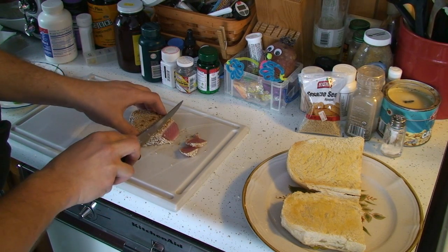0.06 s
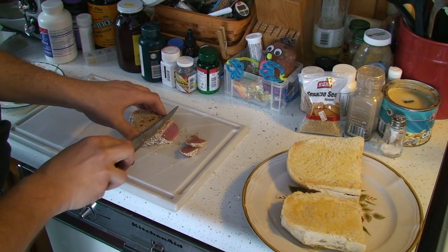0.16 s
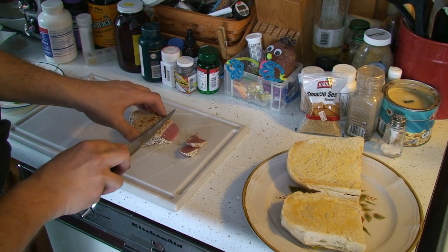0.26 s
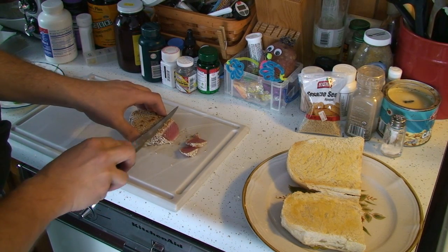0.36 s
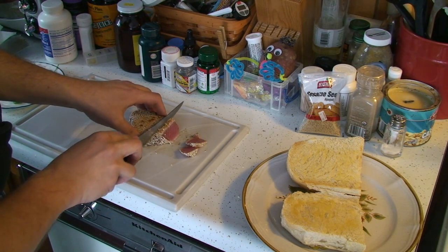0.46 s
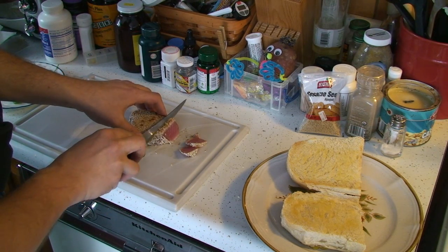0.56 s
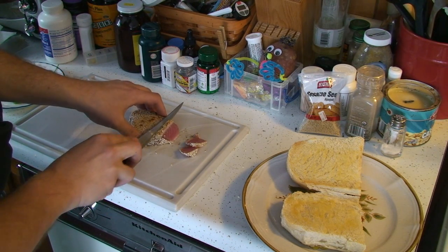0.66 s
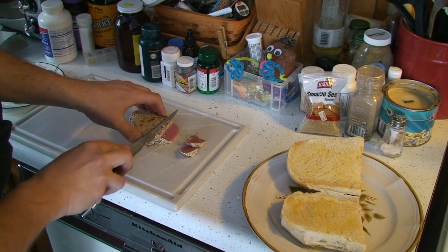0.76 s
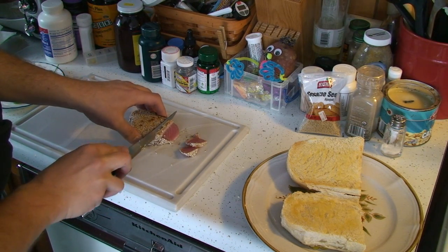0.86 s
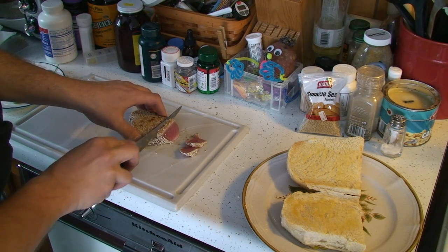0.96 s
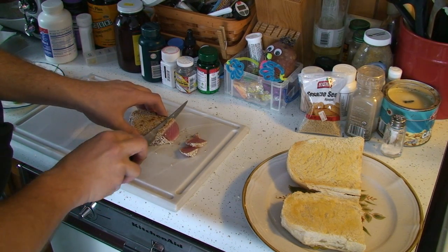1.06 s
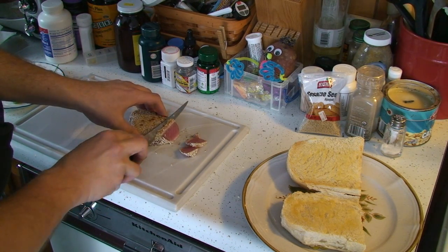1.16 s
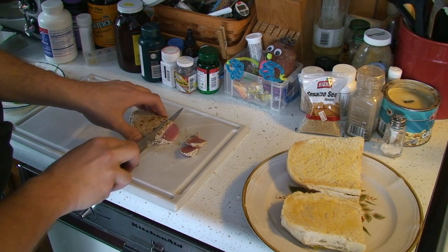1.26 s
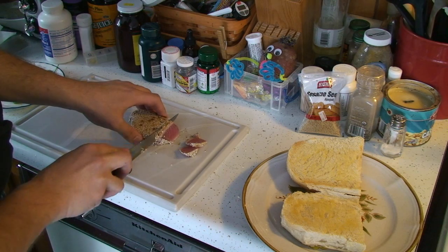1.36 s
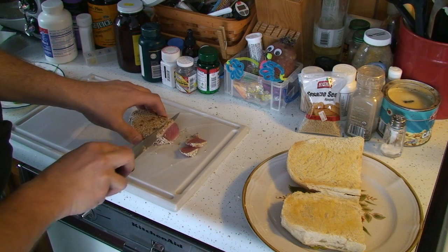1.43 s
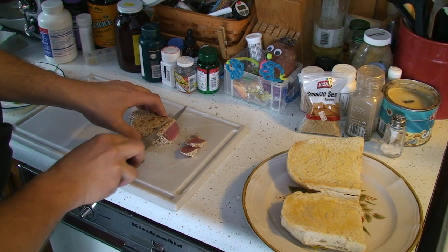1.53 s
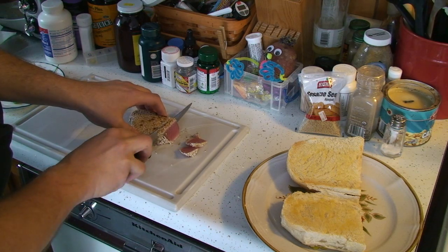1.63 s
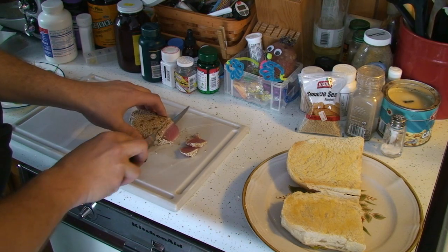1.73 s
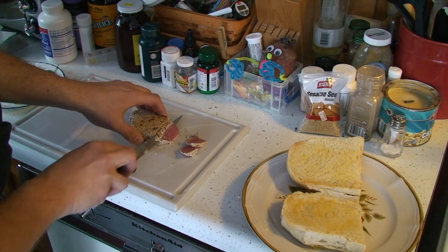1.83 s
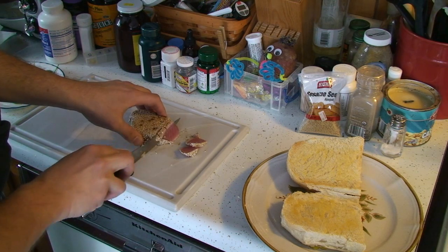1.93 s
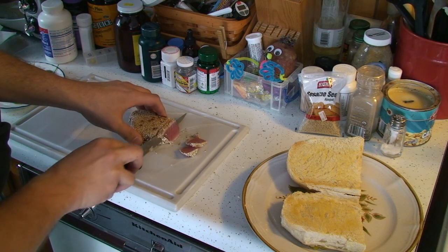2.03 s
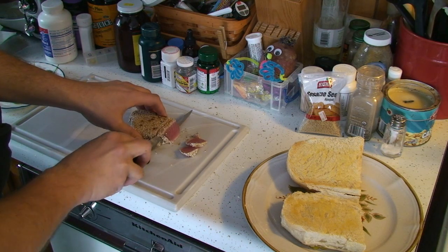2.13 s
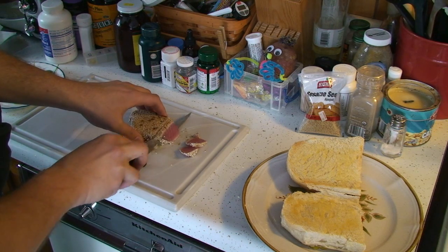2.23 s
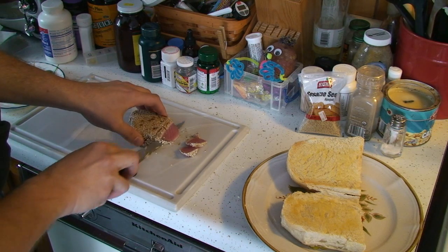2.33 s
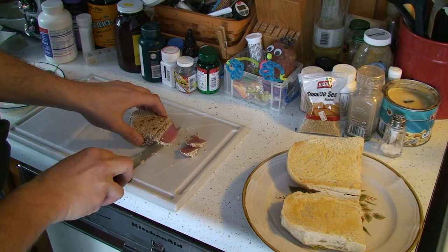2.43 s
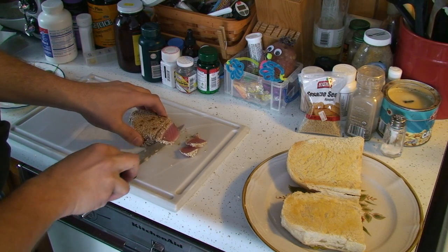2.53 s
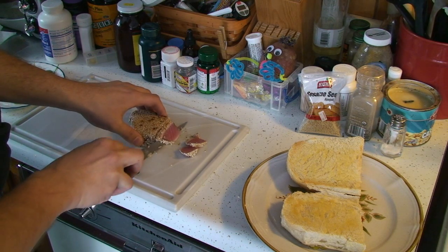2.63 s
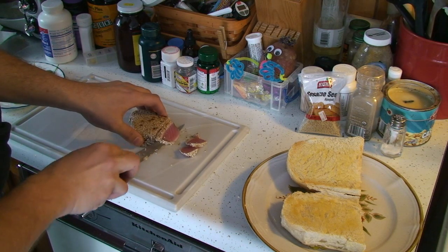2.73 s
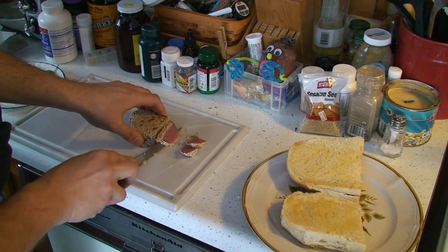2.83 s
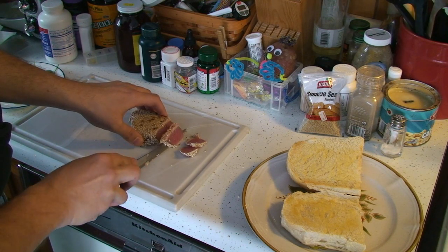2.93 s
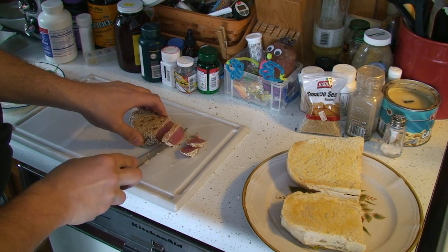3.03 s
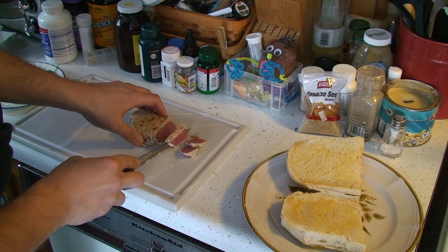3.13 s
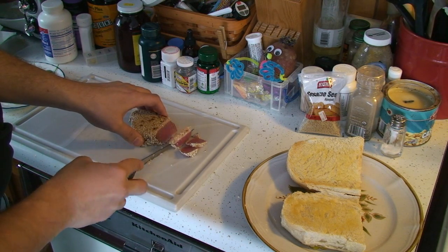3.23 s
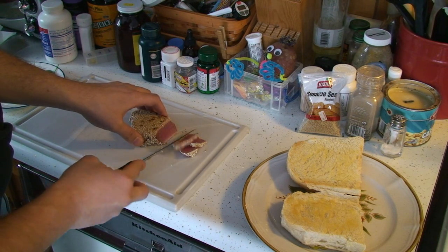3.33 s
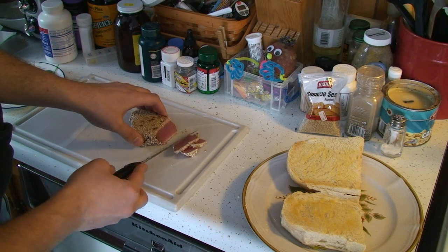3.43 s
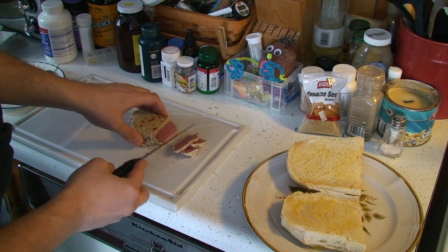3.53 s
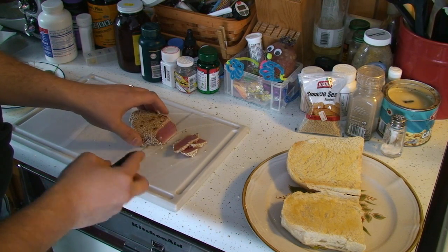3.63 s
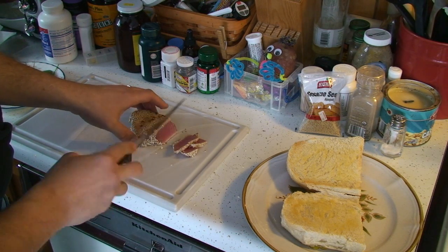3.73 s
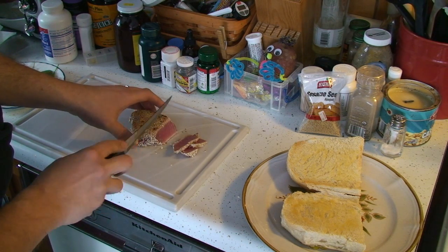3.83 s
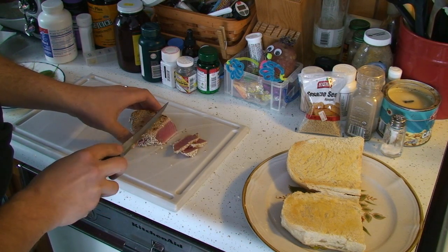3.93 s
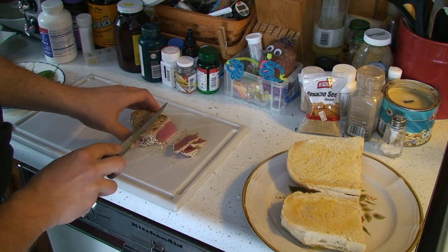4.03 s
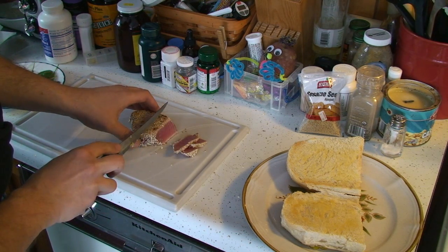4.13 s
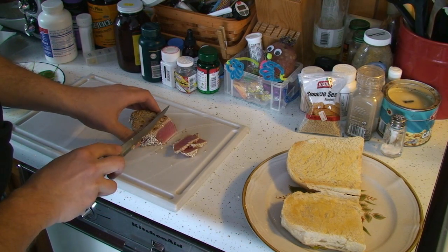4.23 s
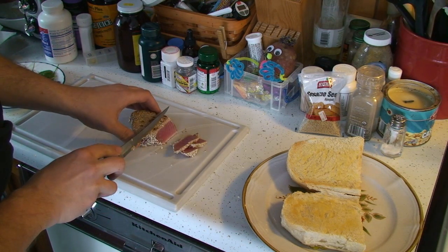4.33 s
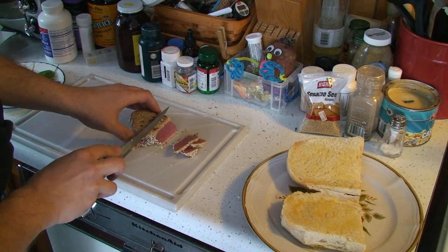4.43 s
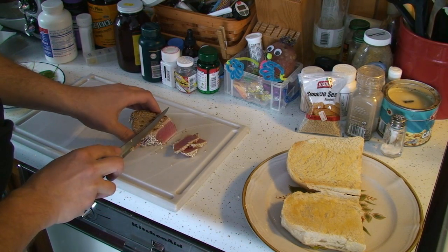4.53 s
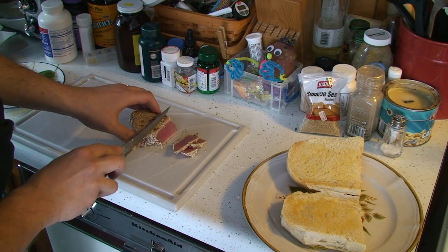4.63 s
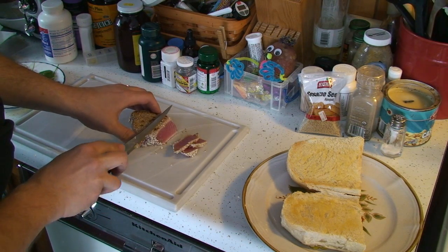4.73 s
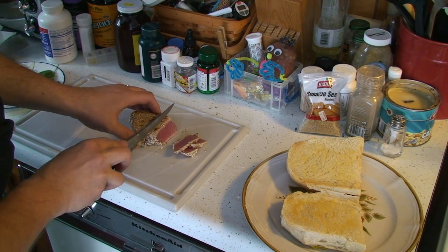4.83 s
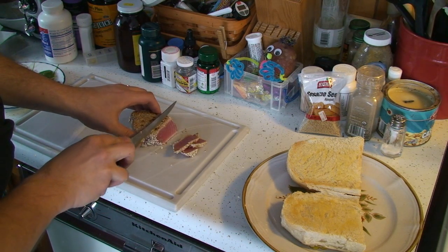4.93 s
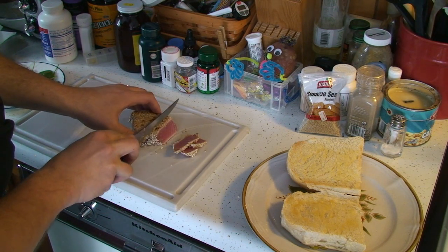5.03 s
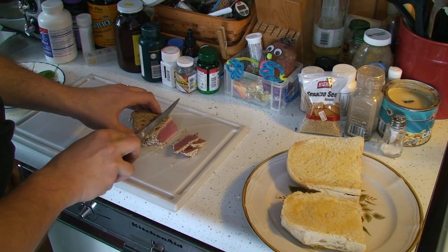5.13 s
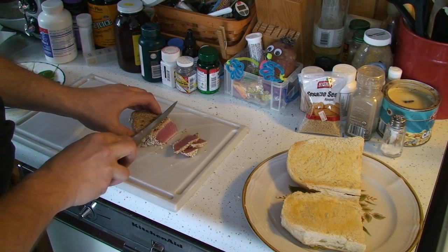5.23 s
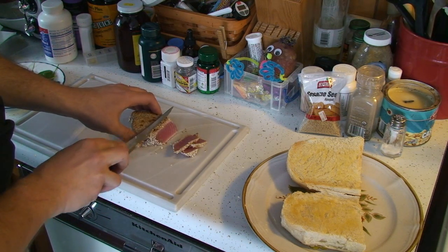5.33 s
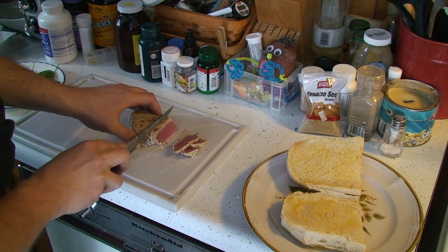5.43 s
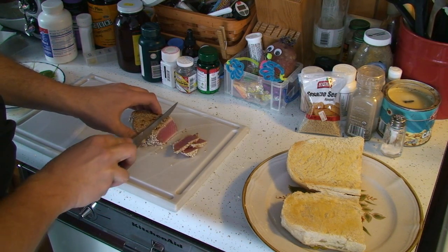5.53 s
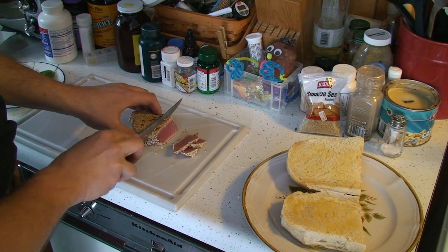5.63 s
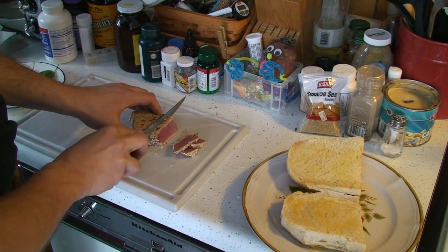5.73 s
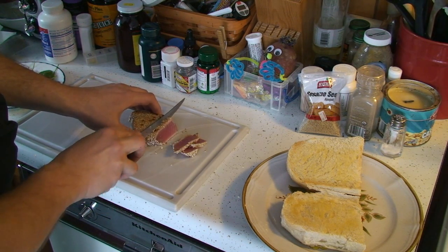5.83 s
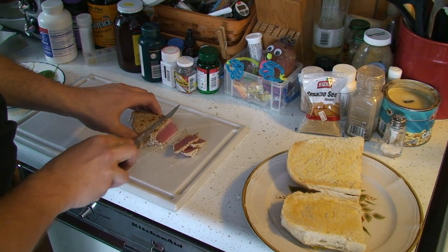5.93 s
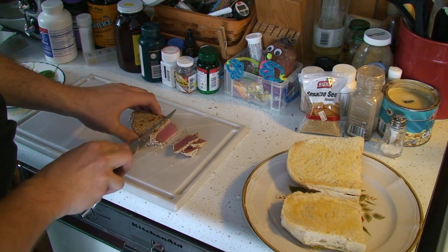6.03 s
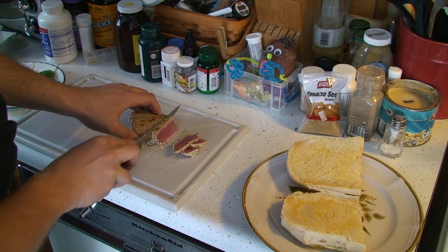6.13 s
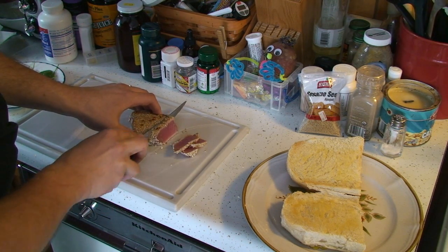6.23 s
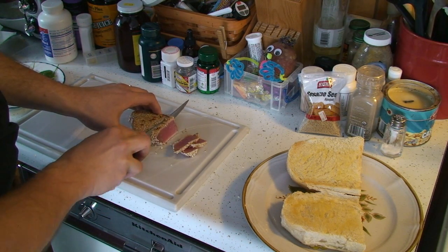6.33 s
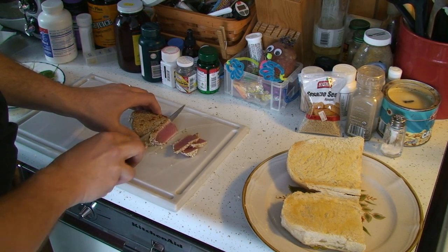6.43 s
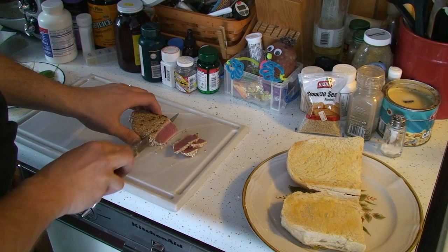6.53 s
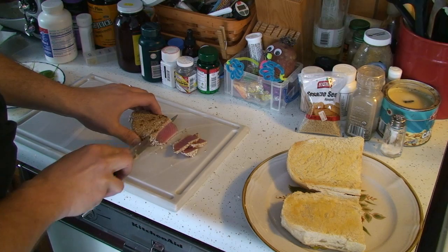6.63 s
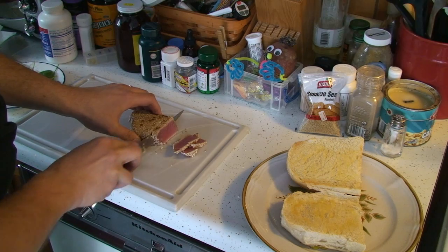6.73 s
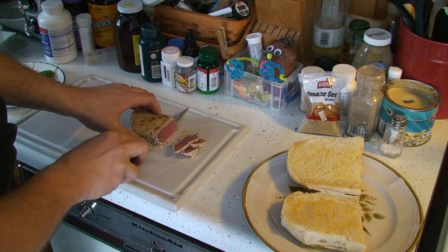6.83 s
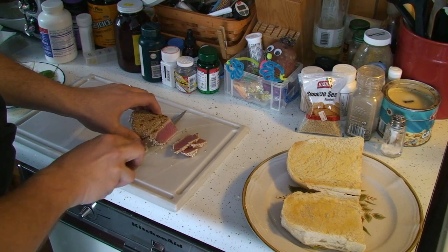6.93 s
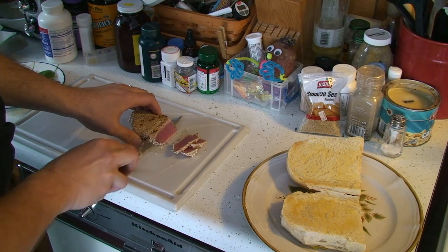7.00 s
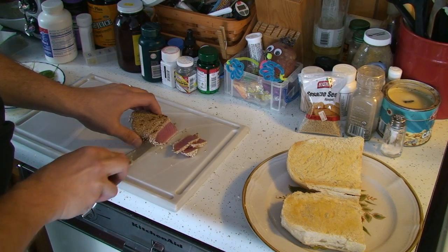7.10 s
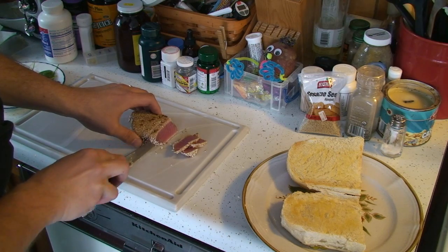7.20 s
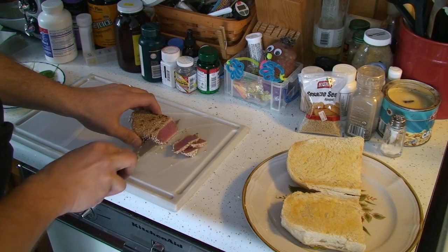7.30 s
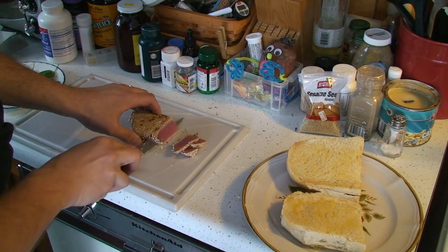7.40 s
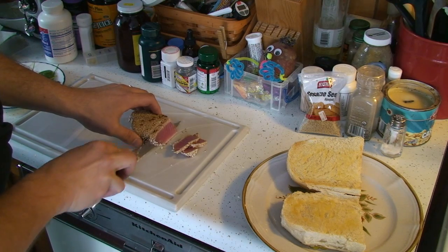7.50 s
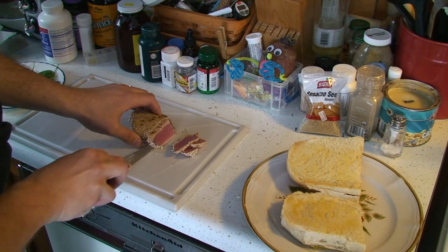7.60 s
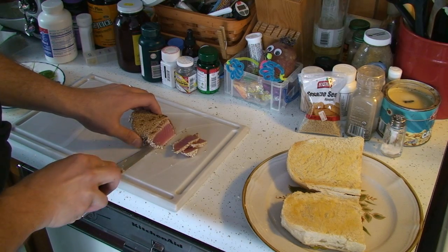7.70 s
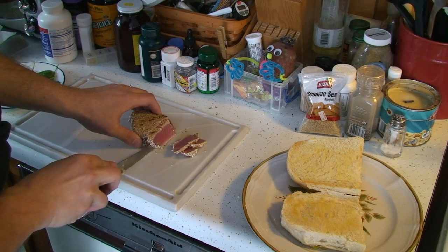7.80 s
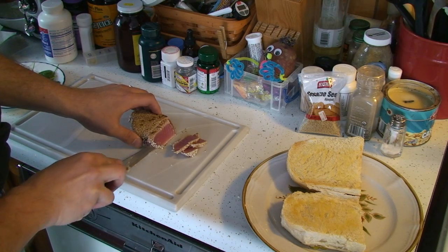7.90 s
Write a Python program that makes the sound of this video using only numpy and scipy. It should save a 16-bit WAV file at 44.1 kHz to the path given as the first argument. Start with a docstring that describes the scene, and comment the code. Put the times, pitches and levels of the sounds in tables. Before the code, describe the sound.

A knife saws through cooked fish in soft grainy strokes, with dull board taps, two hard knocks and scrapes, over a steady fan hum.

```python
"""Slicing tuna in a small kitchen

A knife saws through cooked tuna on a plastic board lying on a counter: shaped noise hisses with each stroke.
Knocks ring the board's modes; twice the blade comes down hard and scrapes, as rasping noise and a low judder.
Gliding tones make the wet fish's squeaks and the steel's whistle, short noise bursts the ticks.
An appliance runs throughout: fan air as noise, a hum and a thin whine as drifting sines."""
import sys
import numpy as np
from scipy import signal
from scipy.fft import rfft, irfft
from scipy.io import wavfile

SR = 44100
rng = np.random.default_rng(int(sys.argv[2]) if len(sys.argv) > 2 else 0)


def dump(signal):
    """Clip the signal to [-1, 1] and save it as 16-bit WAV at the path in sys.argv[1]."""
    limited = np.clip(np.atleast_2d(signal).T, -1, 1)
    pcm = np.round(limited * 32767).astype(np.int16)
    wavfile.write(sys.argv[1], SR, pcm)


N = 351036

# Modes of the board on its counter. Each row: frequency in Hz, level in dB, t60 in s.
BOARD_MODES = [(47.1, -32, 0.9), (79, -24.5, 0.54), (109.8, -22, 0.25), (152, -23, .25), (229.2, -15, 0.26),
               (316, -19, 0.062), (398.8, -4, 0.17), (435.6, -0.5, 0.13), (483, -16, 0.11),
               (599, -15.5, 0.23), (650, -9, 0.16), (703.4, -5.5, 0.15), (735, -3.5, 0.098),
               (784, 2, 0.097), (841, -19, 0.24), (938, -9.5, 0.14), (1024, -11, 0.2), (1078.5, -2, 0.083),
               (1164, 1, 0.062), (1210, -2, 0.048), (1278, -19, 0.094), (1460, -7, 0.095),
               (1493, -11.5, 0.14), (1678, -3.5, 0.086), (1783, -6.5, 0.099), (2146, -8.5, 0.057),
               (2307, -15.5, 0.16), (2485, -14.5, 0.039), (3124, -14.5, 0.14), (3162, -12, 0.13)]
# Spectrum of contact rubbing along the board or the wet fish. Each row: frequency in Hz, density in dB per Hz.
RUB_SPECTRUM = [(60, -12), (250, -21), (420, 4.5), (560, 2), (760, -4.5), (930, -4), (1150, 0), (1750, -5),
                (2400, -10.5), (3200, -16.5), (4200, -18), (9000, -40)]


def gain_of(db):
    """Decibels to amplitude."""
    return 10 ** (np.asarray(db) / 20)


def evened(x):
    """Scales to rms 1."""
    return x / np.sqrt(np.mean(x ** 2) + 1e-20)


def read(points, hz):
    """Reads a table at hz, joining its points on a log-frequency axis."""
    f, value = np.transpose(points)
    return np.interp(np.log(hz + 1), np.log(f + 1), value)


def bumps(peaks, f):
    """dB added by resonances given as (Hz, width Hz, dB)."""
    return sum(db / (1 + (2 * (f - hz) / width) ** 2) for hz, width, db in peaks)


def add(mix, s, sound):
    """Mixes a sound in at time s."""
    part = mix[:, max(round(s * SR), 0):][:, :sound.shape[-1]]
    part += sound[..., :part.shape[1]]


def wander(n, hz):
    """Slow chance of rms 1, up to about hz changes a second."""
    f = np.fft.rfftfreq(n, 1 / SR)
    slow = rfft(rng.standard_normal(n)) / (1 + (f / hz) ** 4)
    return evened(irfft(slow, n))


def noise(n, shape_db, same=None):
    """Stereo noise of rms 1 with the spectrum shape_db(hz); same tells how alike the channels are."""
    if same is None:
        # Likeness of the two microphone channels. Each row: frequency in Hz, correlation from 0 to 1.
        same = [(30, 0.8), (150, 0.1), (700, 0.1), (2000, 0.083), (3300, 0.24), (4500, 0.25), (7500, 0.53),
                (9500, 0.19), (11000, 0.99), (16000, 1)]
    hz = np.fft.rfftfreq(n, 1 / SR)
    mid, side = rfft(rng.standard_normal((2, n))) * gain_of(shape_db(hz))
    correlation = np.clip(read(same, hz), 0, 1)
    mid, side = mid * np.sqrt(1 + correlation), side * np.sqrt(1 - correlation)
    return evened(irfft(np.array([mid + side, mid - side]), n))


def colour(x, shape_db, size=4096):
    """Causal, minimum-phase filter with the gain shape_db(hz)."""
    hz = abs(np.fft.fftfreq(size, 1 / SR))
    log_gain = np.log(np.maximum(gain_of(shape_db(hz)), 1e-5))
    response = np.exp(np.conj(signal.hilbert(log_gain)))
    taps = np.fft.ifft(response).real[:size // 2]
    return signal.fftconvolve(x, taps[None], axes=1)[:, :x.shape[1]]


def kitchen(air_db=-50.5, waver_db=0.5, right_db=0.7):
    """Steady fan air with resonant bands, a hum and a thin whine that dips once, all leaning to the right."""
    # Fan air at the microphone. Each row: frequency in Hz, density in dB per Hz.
    air_spectrum = [(20, -7), (50, 2.5), (90, -6.5), (160, -4.5), (330, -4.5), (450, 2), (540, -2.5),
                    (680, 0.5), (900, -7), (1500, -11), (4200, -18.5), (8500, -17.5), (12000, -25),
                    (16000, -34)]
    # Narrow bands in that air. Each row: centre in Hz, width in Hz, dB over the air.
    fan_bands = [(3210, 380, 4), (4580, 38, 10.5), (6220, 67, 10), (6500, 97, 11), (6850, 200, -2),
                 (7200, 140, 8.5), (7620, 210, 3)]
    hum_hz, hum_db, hum_drift_hz = 241, -57.5, 0.36
    whine_hz, whine_usual_db, whine_drift_hz = 3292, -68, 2
    dip_at_s, dip_db, dip_fall_s, dip_recover_s = 3.2, 6, 0.36, 0.55

    air = gain_of(air_db) * noise(N, lambda f: read(air_spectrum, f) + bumps(fan_bands, f))
    since = np.arange(N) / SR - dip_at_s
    dip_length = np.where(since < 0, dip_fall_s, dip_recover_s)
    whine_db = whine_usual_db - dip_db * np.exp(-(since / dip_length) ** 2)
    for hz, db, drift in (hum_hz, hum_db, hum_drift_hz), (whine_hz, whine_db, whine_drift_hz):
        turns = np.cumsum(hz + drift * wander(N, 5.2)) / SR
        level = np.sqrt(2) * gain_of(db + waver_db * wander(N, 2.2))  # the root makes db an rms level
        air = air + level * np.sin(2 * np.pi * turns)
    return air * gain_of([[-right_db], [right_db]])


def slicing(flesh_db=2.5, grain_db=2):
    """Fibres parting under the blade: a fine, grainy hiss that follows its speed, one arch a stroke."""
    # Each push or pull of the blade. Each row: start in seconds, length in seconds,
    # level in dB at full speed, before the common lift flesh_db.
    strokes = [(-.1, .21, -61.5), (0.127, .225, -56), (0.37, .26, -55.5), (0.67, 0.28, -56),
               (0.932, 0.28, -55.5), (1.213, 0.27, -56.5), (1.478, .245, -54.5), (1.758, 0.26, -54.5),
               (2.01, 0.24, -55.5), (2.235, .26, -64), (4.65, 0.6, -59), (5.22, 0.29, -57),
               (5.462, 0.38, -57.5), (5.882, 0.25, -55.5), (6.132, 0.25, -54.5), (6.447, 0.23, -54.5),
               (6.716, .215, -54), (6.99, .27, -54.5)]
    # Hiss of the parting flesh. Each row: frequency in Hz, density in dB per Hz.
    flesh_spectrum = [(300, -26), (1000, 6.5), (2500, 2), (4500, -0.5), (8000, 3), (10000, 0.5),
                      (12500, -12.5), (16000, -14)]
    t = np.arange(N) / SR
    speed = sum(gain_of(db) * np.sin(np.pi * np.clip((t - s) / length, 0, 1)) for s, length, db in strokes)
    grain = evened(gain_of(grain_db * wander(N, 400)))
    hiss = noise(N, lambda f: read(flesh_spectrum, f)) * grain
    return gain_of(flesh_db) * hiss * speed


def ring(t, phases, spot_db=1, travel_s=0.13, spread=0.087, direct_db=6, direct_s=0.0055):
    """The board's modes: low bending waves arrive late, and the first pass is the strongest."""
    hz, db, t60 = np.transpose(BOARD_MODES)[:, :, None]
    weight, apart = rng.standard_normal((2, len(BOARD_MODES), 1))  # each blow weights the modes anew
    swell = 1 - np.exp(-(t * np.sqrt(hz) / travel_s) ** 3)
    direct = direct_db * np.exp(-(t / direct_s) ** 2)
    size = gain_of(db + spot_db * weight - 60 * t / t60 + direct) * swell
    turns = hz * t + phases
    return np.array([(size * np.sin(2 * np.pi * turns + ear * spread * apart)).sum(0) for ear in (-1, 1)])


def clatter(t, crack_db=7, crack_s=0.0026, travel_s=0.06):
    """Dense resonances: a crack that sweeps from treble to bass, then each band dies at its own speed."""
    # Higher modes and near reflections. Each row: frequency in Hz, density in dB per Hz.
    clatter_spectrum = [(30, -27), (90, -19.5), (200, -14), (310, -8), (420, -0.5), (540, -8.5), (750, -3),
                        (930, -8.5), (1150, 0.5), (1750, -6.5), (2400, -8.5), (3200, -8), (4200, -14),
                        (7000, -15), (15000, -21)]
    # How long they last. Each row: frequency in Hz, t60 in s.
    clatter_t60 = [(80, 0.66), (260, 0.25), (700, 0.11), (1800, 0.14), (4000, 0.063), (10000, 0.069)]
    hiss = noise(len(t), lambda f: read(clatter_spectrum, f), [(500, 1.0), (1500, 0.87), (5000, 0.89)])
    hz, when, z = signal.stft(hiss, SR, nperseg=128, noverlap=96)
    hz = hz[:, None]
    late = when + 0.0014 - travel_s / np.sqrt(hz + 100)  # time since this band's wave arrived
    onset = 1 / (1 + np.exp(-np.maximum(late / 0.0011, -30)))
    decay_db = -60 * when / read(clatter_t60, hz)
    crack = crack_db * np.exp(-abs(late) / crack_s)
    z = z * onset * gain_of(decay_db + crack)
    return signal.istft(z, SR, nperseg=128, noverlap=96)[1][:, :len(t)]


def knocks(ring_db=-3.0, clatter_db=-4.0, thump_hz=240, spot_db=3, spot_width=0.49, size=22050):
    """Each blow rings the board; soft contact through the fish cuts the treble and leaves a thump."""
    # Blade meets board. Each row: time in seconds, level in dB before the filtering,
    # contact cut-off in Hz (high is hard), thump in dB (the weight of the hand), Hz favoured by the spot struck.
    blows = [(.107, -49.5, 890, 21, 430), (0.649, -45, 1020, 24.5, 397), (.682, -34, 1610, 6, 380),
             (1.181, -43.5, 950, 25.5, 400), (1.264, -36, 1640, 16.5, 800), (1.703, -48.5, 400, 27, 400),
             (1.791, -38, 1240, 12.5, 800), (2.17, -25.5, 2600, -7, 1230),
             (2.4576, -15.5, 2320, -11.5, 750), (2.4626, -14, 990, -9, 720), (2.5866, -22.5, 1880, 7, 714),
             (2.601, -27.5, 1800, 1, 1100), (3.638, -37.5, 1570, 13, 387), (4.086, -44, 1800, -3, 600),
             (4.615, -56, 400, 24, 300), (5.2207, -38, 1900, 15.5, 800), (5.825, -45, 540, 26, 430),
             (5.881, -40.5, 1770, 16, 750), (6.439, -45.5, 1400, 17, 397), (6.8662, -32, 2070, 10, 1090),
             (7.282, -27.5, 2940, 2.5, 1390), (7.3324, -21, 2200, 1, 684), (7.511, -47, 1760, 15, 540),
             (7.6324, -13.5, 3180, -1.5, 1450)]
    out, t = np.zeros((2, N)), np.arange(size) / SR
    early = t < .03  # both parts are levelled over their first 30 ms
    for s, db, contact_hz, thump_db, spot_hz in blows:
        parts = ring(t, rng.random((len(BOARD_MODES), 1))), clatter(t)
        blow = sum(gain_of(share) * p / p[:, early].std() for share, p in zip((ring_db, clatter_db), parts))
        spot = [(spot_hz, spot_width * spot_hz, spot_db)]

        def contact(f):
            thump = thump_db / (1 + (f / thump_hz) ** 2)
            softness = 10 * np.log10(1 + (f / contact_hz) ** 4)
            return thump - softness + bumps(spot, f)

        add(out, s, gain_of(db) * colour(blow, contact))
    return out


def snaps(decay_s=0.0018, octaves=0.23, snap_db=5, size=2048):
    """Tiny ticks, each a short noise burst around its own pitch."""
    # Ticks of the edge and of moist fibres snapping. Each row: time in seconds,
    # level in dB before the common lift snap_db, centre in Hz.
    ticks = [(0.428, -48.5, 9850), (0.691, -42.5, 9800), (.975, -55, 13000), (1.9077, -47, 8000),
             (2.038, -49, 8500), (2.2599, -48, 9000), (2.3164, -41, 7300), (2.458, -36.5, 6300),
             (2.5602, -46, 6000), (2.7917, -38.5, 6800), (2.908, -51, 6300), (6.652, -42.5, 9700),
             (7.497, -51, 9000), (7.548, -51, 9000), (7.6332, -29, 5650)]
    out, t = np.zeros((2, N)), np.arange(size) / SR
    for s, db, hz in ticks:
        burst = noise(size, lambda f: -10 * np.log10(1 + (np.log2((f + 1) / hz) / octaves) ** 4))
        add(out, s, gain_of(db + snap_db) * burst * np.exp(-t / decay_s))
    return out


def squeaks(slip_s=.0055, decay_s=0.0038, rise_s=0.0011, scatter=0.04, rasp_db=-11, size=4096):
    """Uneven stick-slip: each slip rasps and sets the wet contact ringing for a few cycles as its pitch glides."""
    # Wet fish sticking and slipping on the blade. Each row: start in seconds, length in seconds,
    # starting pitch in Hz, glide in octaves per s, nominal level in dB before the fade, overtone in dB.
    slides = [(0.436, .017, 1615, -22, -42, -19), (.457, .016, 990, -1, -43.5, -22),
              (4.059, .017, 925, 4, -35.5, -23), (4.093, 0.013, 960, -3.5, -39, -19),
              (4.119, .02, 830, -7, -51, -11), (4.343, .014, 1255, -5.5, -49.5, -7),
              (6.308, 0.028, 615, -1.5, -39, -6), (6.35, 0.008, 1610, -3, -45.5, -22),
              (6.368, .03, 721, -2.5, -45, -7)]
    fade_db_per_s = 132  # the grip loosens as the fish slides
    out, t = np.zeros((2, N)), np.arange(size) / SR
    for s, length, hz, glide, db, overtone_db in slides:
        gaps = slip_s * (1 + .5 * rng.uniform(-1, 1, 40))
        slips = np.r_[0, np.cumsum(gaps)]
        since = np.maximum(t - slips[slips < length, None], 0)
        ringing = (np.exp(-since / decay_s) - np.exp(-since / rise_s)).sum(0)
        pitch = hz * 2 ** (glide * np.minimum(t, length)) * (1 + scatter * wander(size, 230))
        phase = 2 * np.pi * np.cumsum(pitch) / SR
        tone = np.sin(phase) + gain_of(overtone_db) * np.sin(2 * phase)
        rasp = gain_of(rasp_db) * noise(size, lambda f: read(RUB_SPECTRUM, f), [(500, 0.66), (3000, 0.65)])
        add(out, s, 2 * gain_of(db - fade_db_per_s * t) * ringing * (tone + rasp))
    return out


def pressure(t, length, attack_s, swell_db_per_s=0, release_s=0.05):
    """The edge bites, holds while the hand bears down or eases off, then slows and lifts."""
    bite = np.clip(t / attack_s, 0, 1)
    lift = np.clip((length - t) / release_s, 0, 1)
    return bite * lift * gain_of(swell_db_per_s * (np.minimum(t, length) - length / 2))


def drags(rub_grain_db=1.5, steel_grain_db=1.5, mode_db=6, mode_width_hz=30, sing_width=0.032, size=22050):
    """The edge catches and slips on the plastic: the board's modes rasp and the blade hisses."""
    # The edge dragged along the board. Each row: start in seconds, length in seconds, attack in seconds,
    # board rub in dB midway, steel hiss in dB, swell of the rub in dB per s,
    # Hz at which the contact sings, its lift in dB.
    scrapes = [(2.265, 0.28, 0.039, -39, -50.5, 38, 446, 4.5),
               (2.553, 0.14, 0.046, -40, -43.5, -40, 6800, 4),
               (2.743, 0.046, 0.016, -49, -40.5, -20, 6400, 11),
               (2.788, .17, 0.0046, -50, -49, 15, 6360, 4), (6.961, 0.093, 0.027, -41, -60, -60, 1075, 7),
               (7.291, 0.19, 0.025, -40.5, -54.5, -95, 458, 5),
               (7.514, 0.12, 0.014, -46.5, -54, 30, 4800, -3),
               (7.59, 0.18, 0.0034, -41.5, -41, -87, 4870, 6), (7.747, 0.095, .015, -54, -53, -40, 4800, 5),
               (7.878, 0.14, 0.062, -51.5, -44.5, 20, 4720, 10)]
    # Hiss of the steel. Each row: frequency in Hz, density in dB per Hz.
    steel_spectrum = [(500, -34), (1500, -4.5), (2800, -5), (4000, -4), (5200, -4), (5700, -3),
                      (7000, -2.5), (9000, -5), (11000, -10.5), (13000, -19), (16000, -24)]
    # Resonances of the blade. Each row: frequency in Hz, width in Hz, lift in dB.
    blade_modes = [(1740, 440, 11), (3220, 200, 12), (4820, 260, 4.5), (5250, 300, 5), (6600, 400, 4),
                   (7050, 430, 2), (9670, 400, 5.5)]
    out, t = np.zeros((2, N)), np.arange(size) / SR
    modes = [(hz, mode_width_hz, mode_db) for hz, _, _ in BOARD_MODES]
    for s, length, attack_s, rub_db, steel_db, swell, sing_hz, sing_db in scrapes:
        sing = [(sing_hz, sing_width * sing_hz, sing_db)]
        rub = noise(size, lambda f: read(RUB_SPECTRUM, f) + bumps(modes + sing, f), [(500, 0.98), (3000, 1.0)])
        steel = noise(size, lambda f: read(steel_spectrum, f) + bumps(blade_modes + sing, f))
        rub = rub * pressure(t, length, attack_s, swell)
        steel = steel * pressure(t, length, attack_s)
        for sound, db, grain_db in (rub, rub_db, rub_grain_db), (steel, steel_db, steel_grain_db):
            grain = evened(gain_of(grain_db * wander(size, 310)))
            add(out, s, gain_of(db) * sound * grain)
    return out


def judder(jitter=0.053, flutter_db=4.0):
    """Regular stick-slip of the edge on the plastic: a rough, low groan that grows as the hand bears down."""
    # Harmonics of the slip rate. Each entry: level in dB, from the first harmonic up.
    harmonics = [-7, 4.5, -1, -10, -15, -23]
    start_s, length_s, attack_s = 2.275, 0.2, 0.046
    slips_hz, midway_db, swell_db_per_s = 376, -38, 43
    t = np.arange(SR) / SR
    turns = np.cumsum(slips_hz * (1 + jitter * wander(SR, 130))) / SR
    groan = np.zeros(SR)
    for number, db in enumerate(harmonics, 1):
        size = gain_of(db + flutter_db * wander(SR, 60))
        groan += size * np.sin(2 * np.pi * (number * turns + rng.random()))
    out = np.zeros((2, N))
    hand = pressure(t, length_s, attack_s, swell_db_per_s)
    add(out, start_s, gain_of(midway_db) * evened(groan) * hand)
    return out


def whistles(waver_hz=70, flutter_db=7.0, flutter_hz=130, attack_s=0.0089, size=11025):
    """A fluttering steel note, steady at first, then sinking as the contact slides towards the tip."""
    # The thin blade whistling as it is drawn out. Each row: start in seconds, length in seconds,
    # starting pitch in Hz, glide in Hz per s, level in dB.
    notes = [(2.753, .018, 6480, 0, -47), (2.825, 0.15, 6470, -2900, -54.5)]
    out, t = np.zeros((2, N)), np.arange(size) / SR
    for s, length, hz, glide, db in notes:
        turns = np.cumsum(hz + glide * t + waver_hz * wander(size, 300)) / SR
        flutter = evened(gain_of(flutter_db * wander(size, flutter_hz)))
        tone = evened(np.sin(2 * np.pi * turns))
        add(out, s, gain_of(db) * flutter * pressure(t, length, attack_s) * tone)
    return out


def room(x, t60=0.26, wet_db=-14, gap_s=0.0079, size=22050):
    """The small kitchen's short, soft tail: the work convolved with decaying noise after a brief gap."""
    t = np.arange(size) / SR
    tail = noise(size, lambda f: read([(100, -8.5), (3000, 5.5), (12000, -2.0)], f))
    tail = tail * gain_of(-60 * t / t60) * (t > gap_s)
    return gain_of(wet_db) * signal.fftconvolve(x, tail / np.linalg.norm(tail[0]), axes=1)[:, :N]


def scene():
    """Knife work in the room, over the appliance's air, hum and whine."""
    work = slicing() + knocks() + snaps() + squeaks() + drags() + judder() + whistles()
    return work + room(work) + kitchen()


def record(dry, edge_hz=15600):
    """Full-scale limit, then a low-pass at the top of the band."""
    low_pass = signal.firwin(255, edge_hz, window=("kaiser", 8), fs=SR)
    return signal.oaconvolve(np.clip(dry, -1, 1), low_pass[None], "same")


dry = scene()
out = record(dry)
dump(out)
```